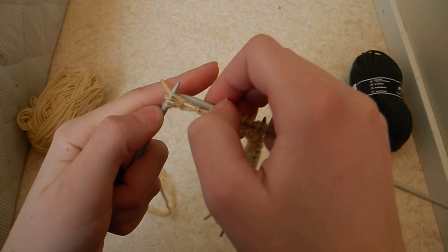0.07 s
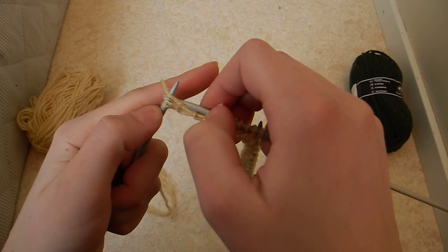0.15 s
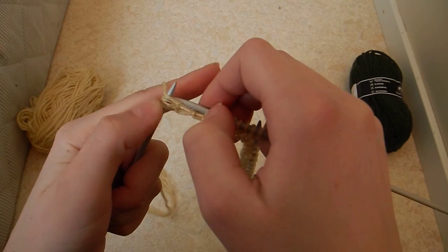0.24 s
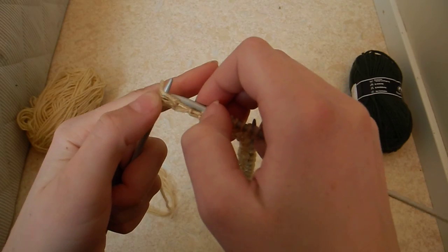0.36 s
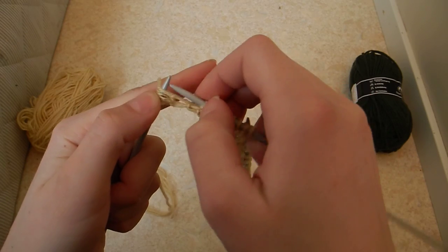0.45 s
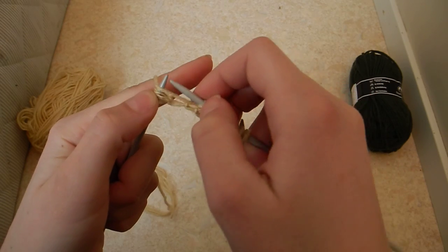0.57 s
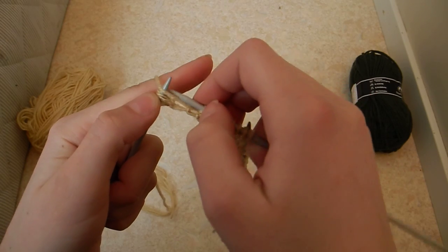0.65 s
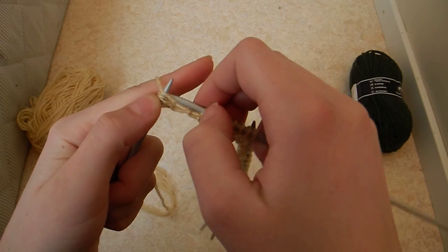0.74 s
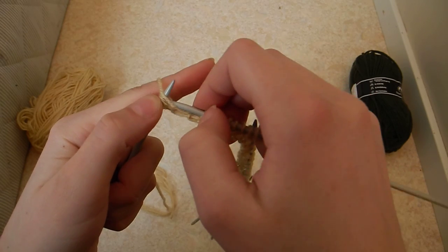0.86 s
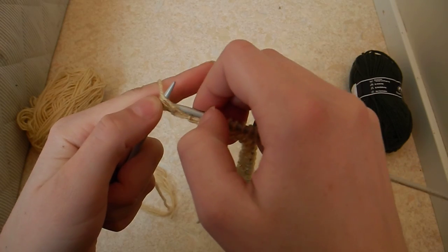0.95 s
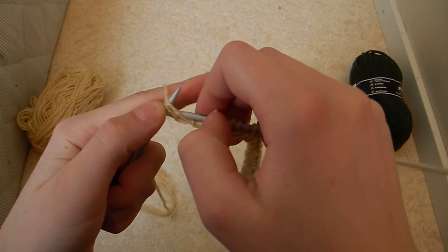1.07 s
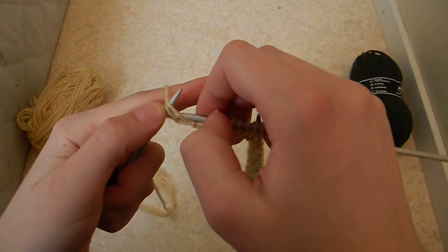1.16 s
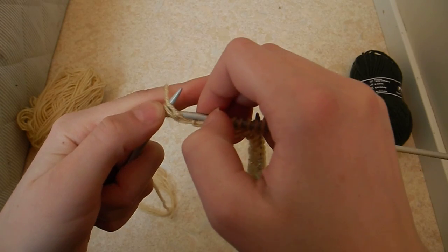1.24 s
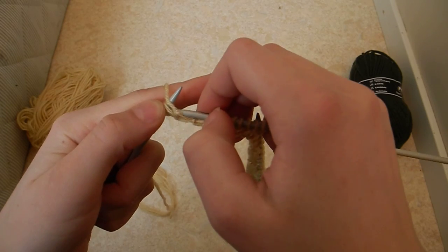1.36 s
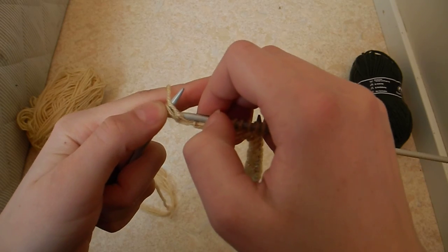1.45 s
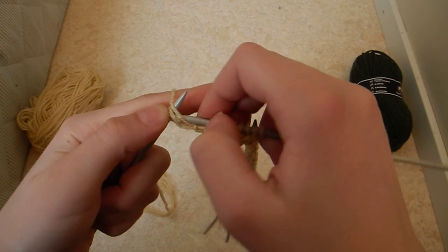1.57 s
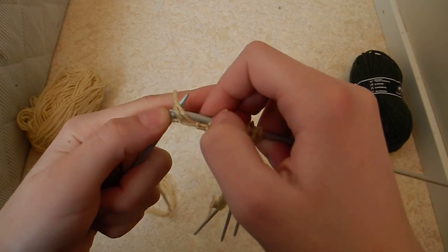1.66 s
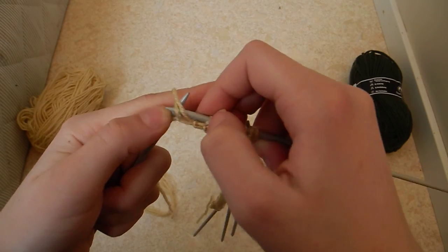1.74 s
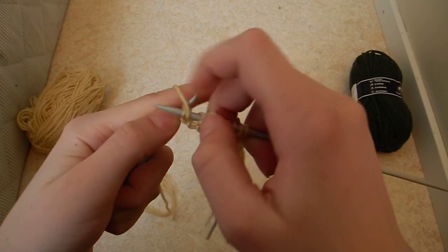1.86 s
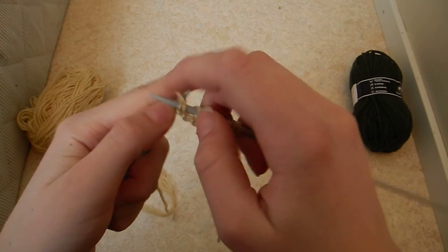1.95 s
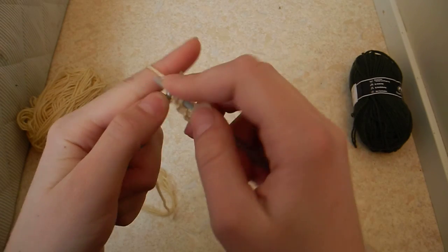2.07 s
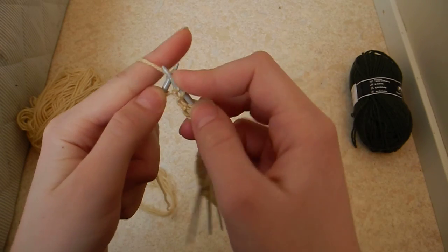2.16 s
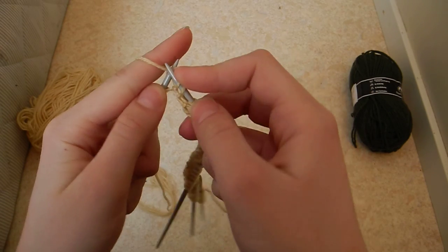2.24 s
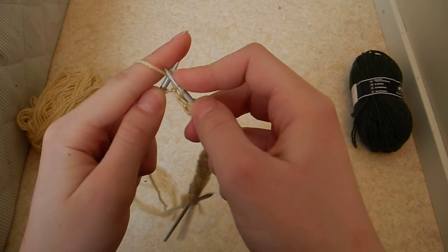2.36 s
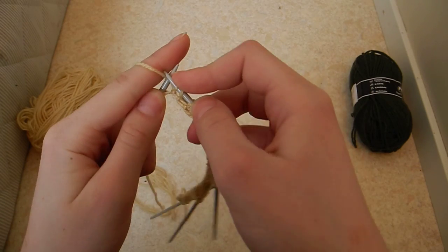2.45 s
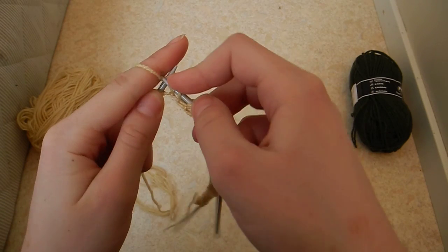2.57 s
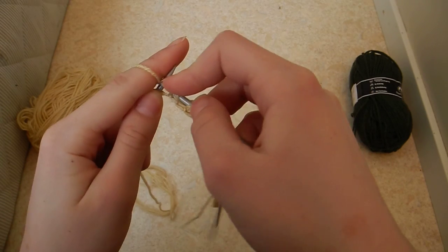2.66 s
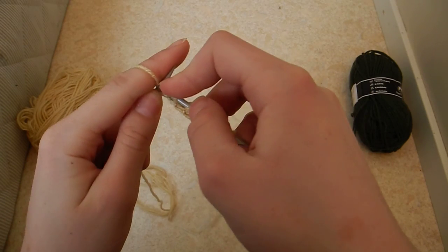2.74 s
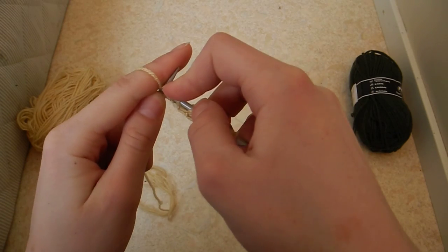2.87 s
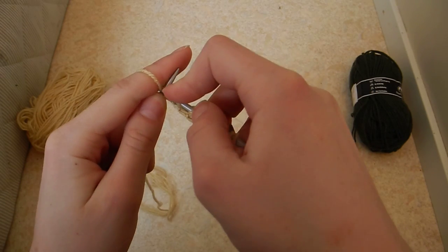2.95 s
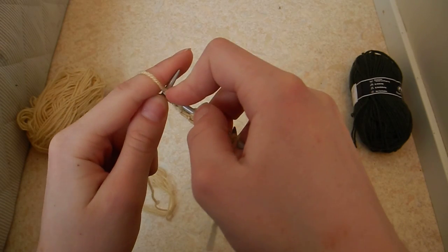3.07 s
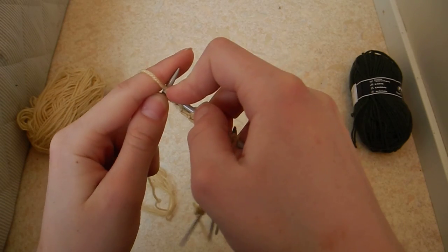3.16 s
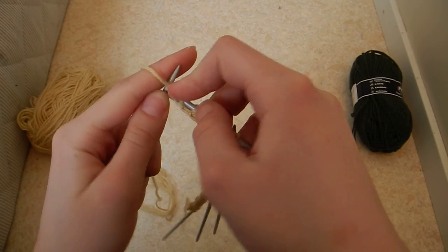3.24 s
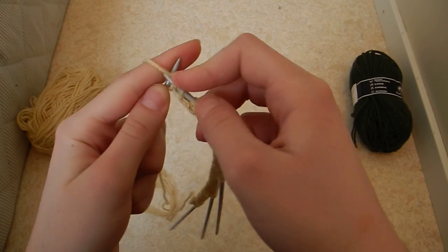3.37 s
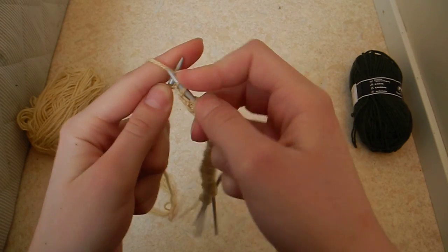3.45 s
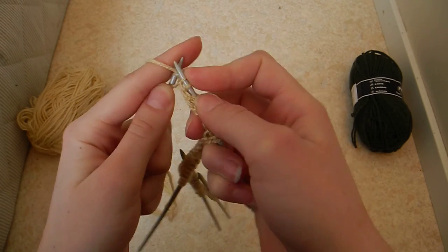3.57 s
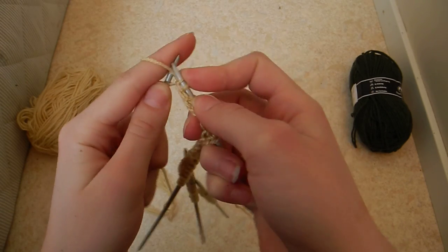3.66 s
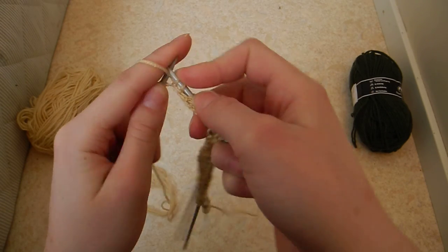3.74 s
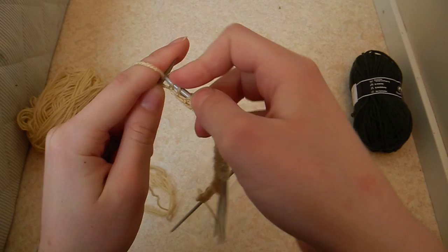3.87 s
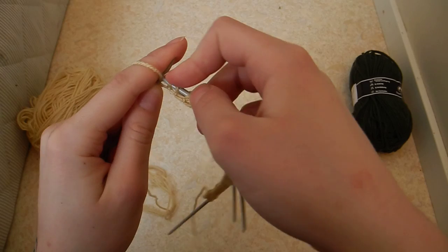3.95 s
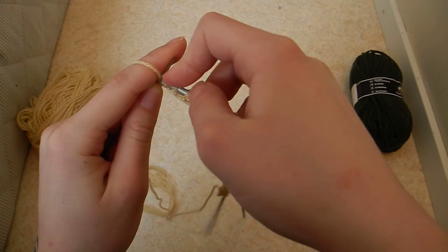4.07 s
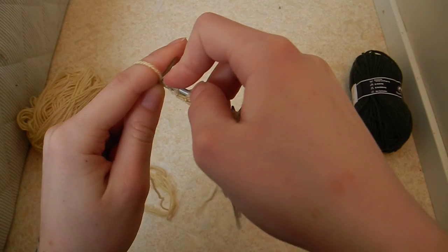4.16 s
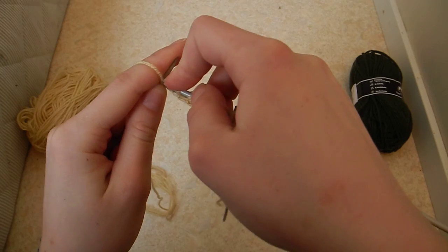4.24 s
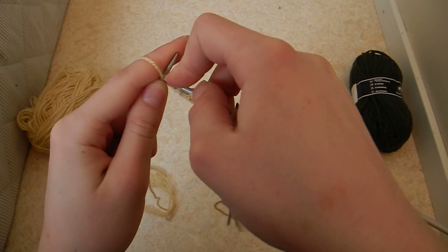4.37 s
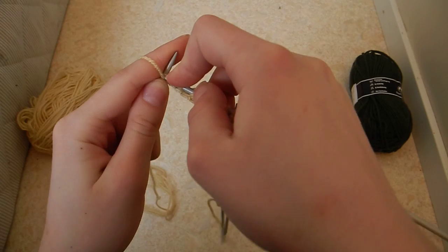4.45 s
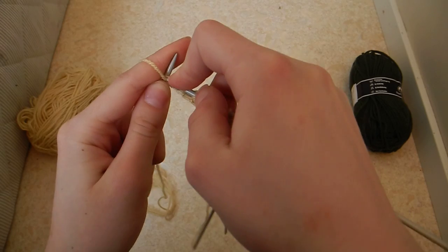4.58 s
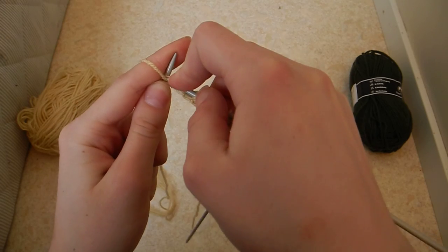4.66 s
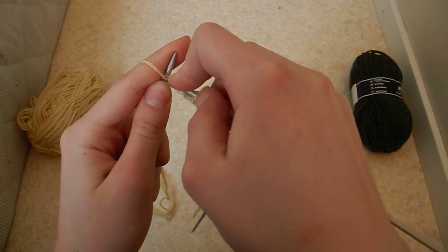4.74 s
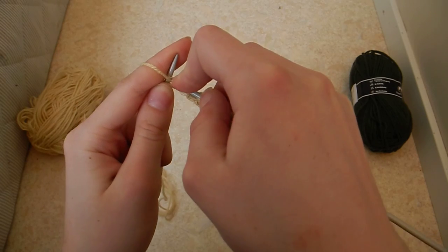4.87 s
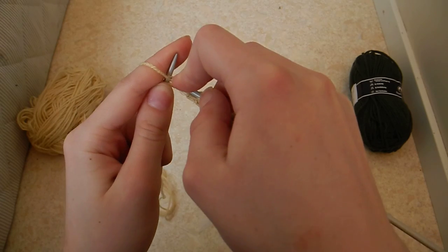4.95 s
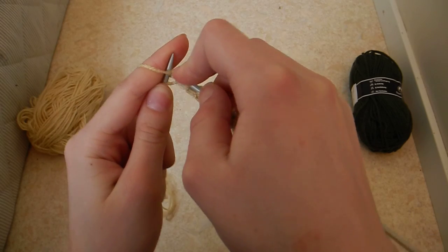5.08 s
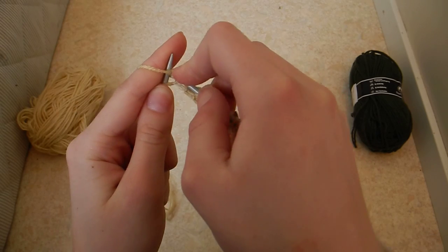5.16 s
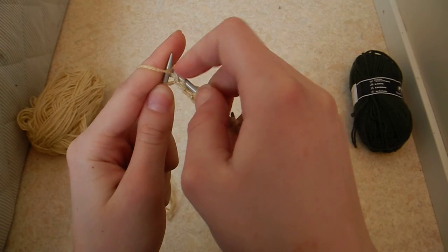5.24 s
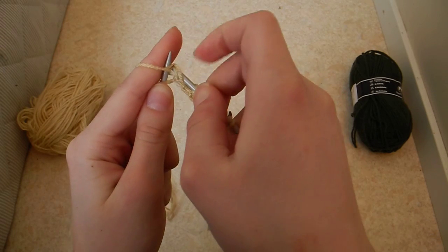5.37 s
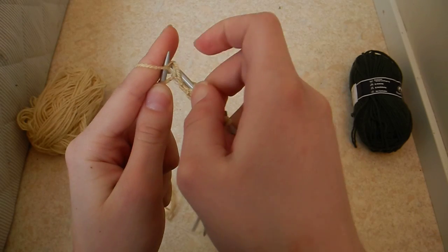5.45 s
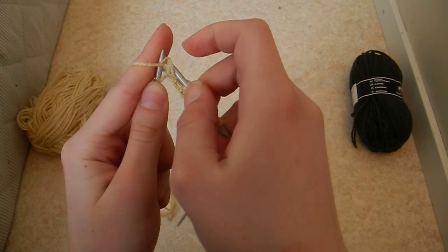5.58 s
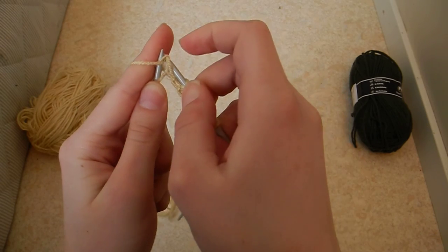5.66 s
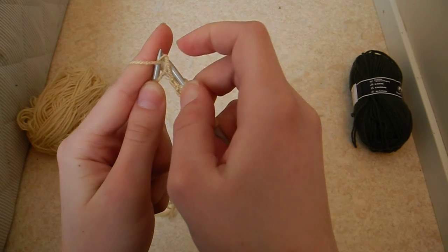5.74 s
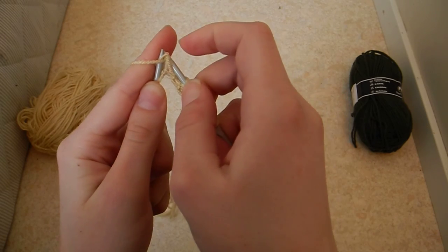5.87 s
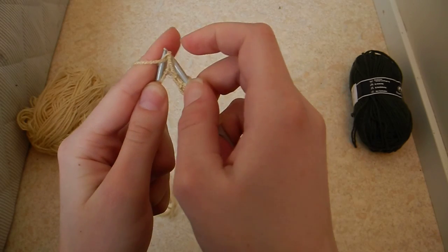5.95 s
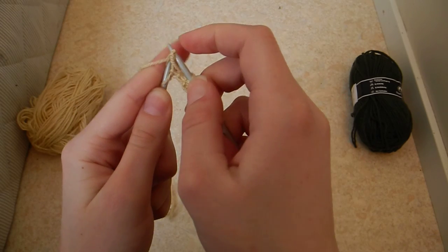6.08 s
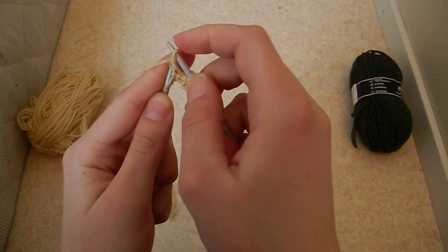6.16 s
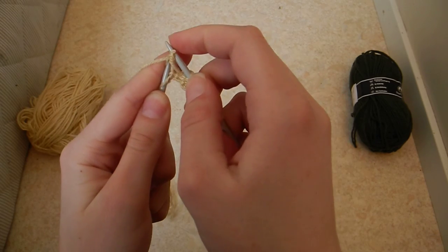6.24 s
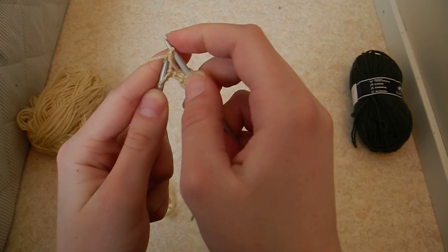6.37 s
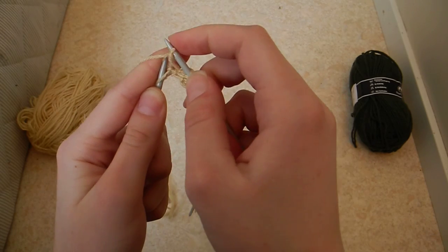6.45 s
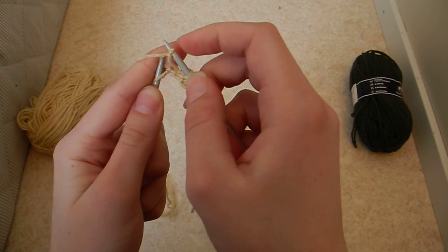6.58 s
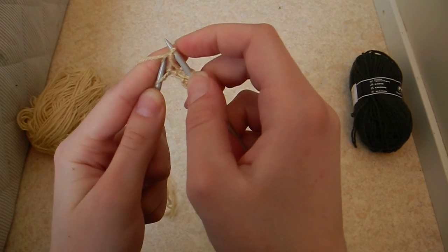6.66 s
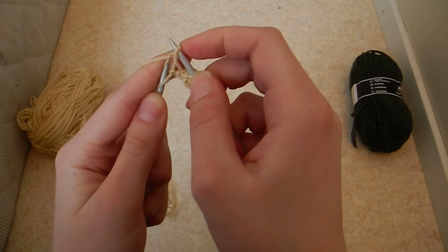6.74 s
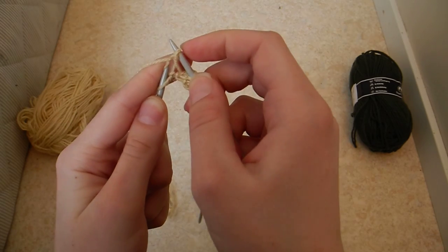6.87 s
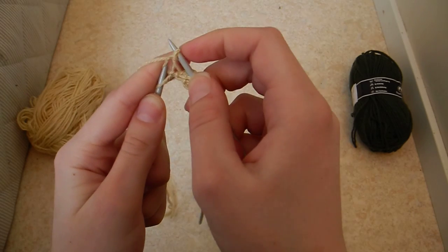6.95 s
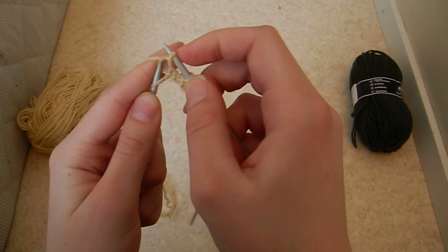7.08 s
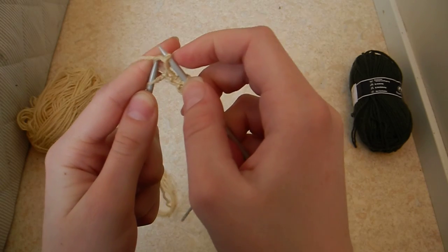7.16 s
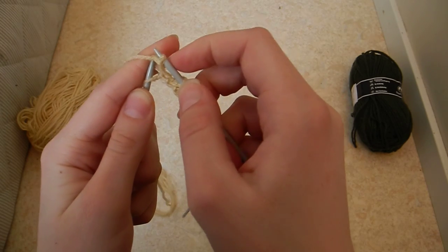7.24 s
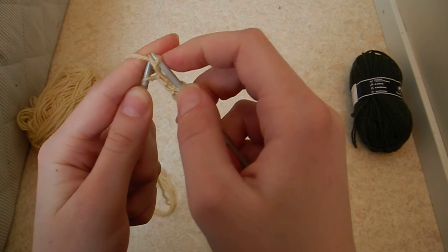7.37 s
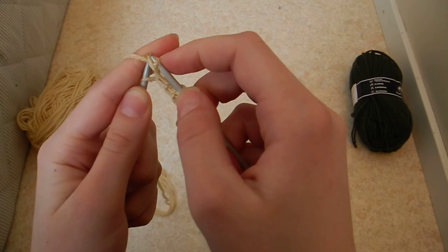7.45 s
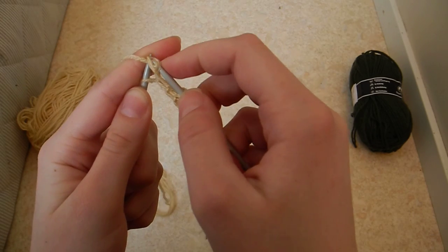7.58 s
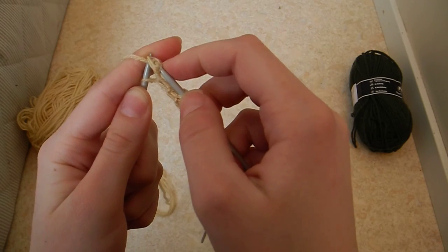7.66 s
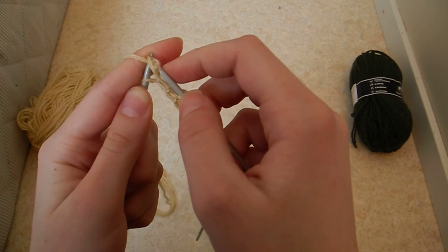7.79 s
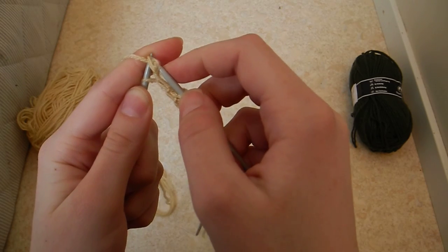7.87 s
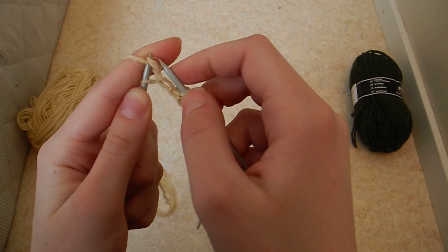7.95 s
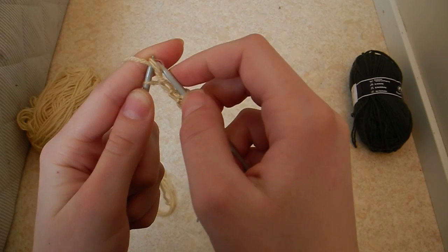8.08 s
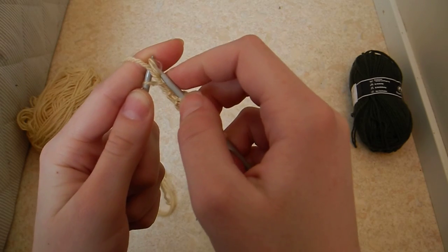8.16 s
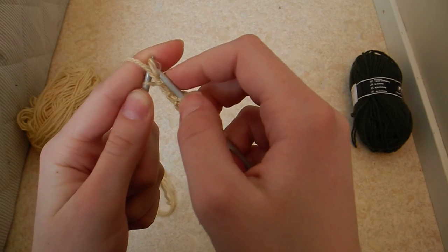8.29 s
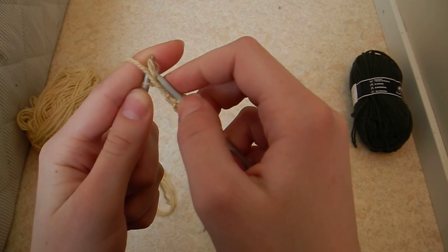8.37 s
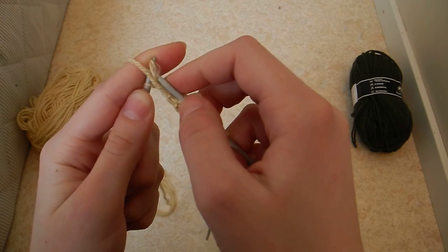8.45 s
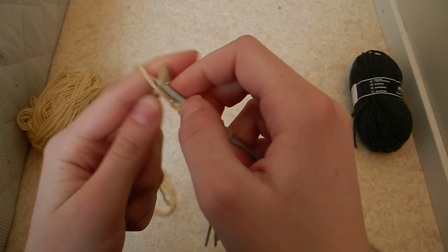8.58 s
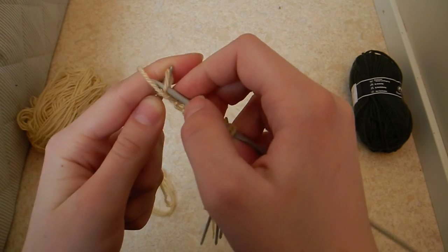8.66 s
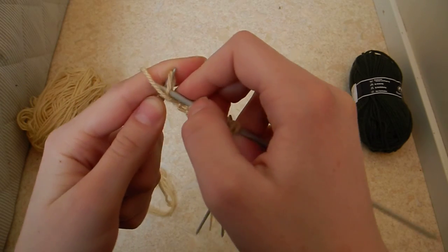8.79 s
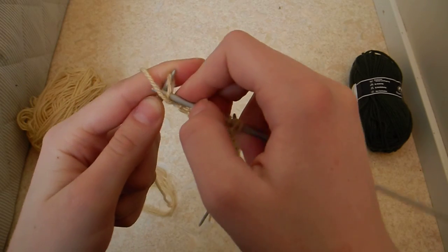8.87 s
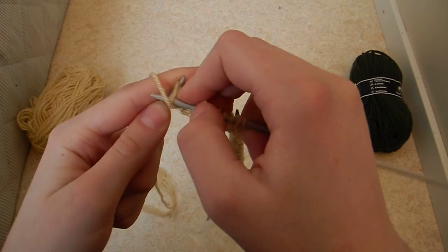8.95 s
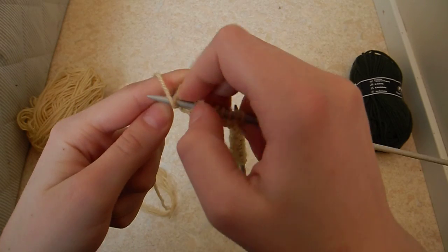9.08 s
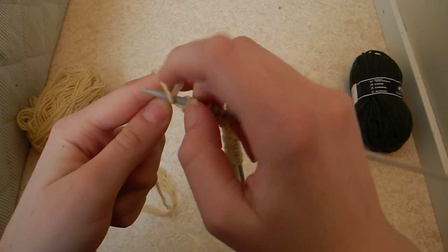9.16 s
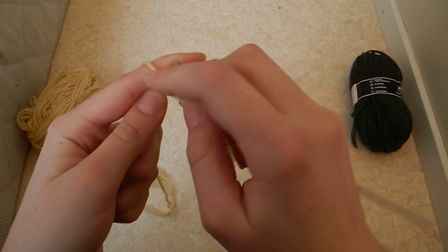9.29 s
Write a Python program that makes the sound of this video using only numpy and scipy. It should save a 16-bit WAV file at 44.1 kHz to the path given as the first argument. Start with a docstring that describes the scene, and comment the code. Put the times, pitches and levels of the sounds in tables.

```python
"""A quiet room: knitting with thin metal needles, heard close up.
The needles tap each other and ring in their bending modes, damped by fingers and wool.
Between the taps, tips tick as short noise snaps and yarn slides in fine noise grains.
Hard knocks sound, most of them near the end, where a loose needle knocks and bounces on something hard.
Mains hum and room air lie underneath; gain control ducks whenever treble peaks pass its limit."""
import sys
import numpy as np
from scipy import signal
from scipy.fft import rfft, irfft
from scipy.io import wavfile
from scipy.ndimage import uniform_filter1d, minimum_filter1d

SR = 44100
rng = np.random.default_rng(int(sys.argv[2]) if len(sys.argv) > 2 else 0)


def generate_wav(signal):
    """Clip the signal to [-1, 1] and save it as 16-bit WAV at the path in sys.argv[1]."""
    frames = np.transpose(np.atleast_2d(signal))
    scaled = np.clip(frames, -1, 1) * 32767
    pcm = np.round(scaled).astype(np.int16)
    wavfile.write(sys.argv[1], SR, pcm)


N = 411012
TIME = np.arange(N) / SR  # the whole scene [s]
RING = np.arange(int(.4 * SR)) / SR  # time within one short sound [s]


def undb(db):
    """Decibels to gain."""
    return 10 ** (np.asarray(db) / 20)


def unit(x):
    """Scale to rms 1."""
    return x / np.sqrt(np.mean(x ** 2))


def pan(db):
    """Left and right gains for a level difference, left minus right in dB."""
    return undb(np.array([[db], [-db]]) / 2)


def fade(t60):
    """Exponential decay that loses 60 dB in t60 seconds."""
    return np.exp(-np.log(1000) * RING / t60)


def add(out, s, sound):
    """Mix a stereo sound in at time s."""
    start = int(s * SR)
    out[:, start:start + sound.shape[1]] += sound[:, :N - start]


def colour(x, points):
    """Filter by a spectrum of (frequency [Hz], level [dB]) points, joined on a log frequency axis."""
    hz, db = np.transpose(points)
    f = np.maximum(np.fft.rfftfreq(x.shape[-1], 1 / SR), 1)
    gain = undb(np.interp(np.log(f), np.log(hz), db))
    return irfft(rfft(x) * gain, x.shape[-1])


def resonate(x, hz, q):
    """One resonance, gain 1 at its centre."""
    b, a = signal.iirpeak(hz, q, fs=SR)
    return signal.lfilter(b, a, x)


def stereo_noise(size, likeness):
    """White noise of which a share of the power is common to both channels."""
    common = rng.standard_normal(size)
    separate = rng.standard_normal((2, size))
    return np.sqrt(likeness) * common + np.sqrt(1 - likeness) * separate


def walk(rate):
    """Slow random drift of rms 1, with about rate new values a second."""
    k = int(SR / rate)
    steps = np.repeat(rng.standard_normal(N // k + 1), k)
    return unit(uniform_filter1d(steps, k)[:N])


def background():
    """Room air, most alike in both channels in the bass, and a slightly wavering mains hum."""
    # room air and microphone hiss: (frequency [Hz], relative level [dB])
    air_spectrum = [(20, -15), (48, -6), (100, -5.5), (170, -5), (300, -7), (500, -10.5), (800, -14),
                    (1300, -16), (1900, -21.5), (2800, -20.5), (4600, -28), (8000, -31), (15000, -32.5),
                    (16500, -41)]
    # mains hum partials: (frequency [Hz], mean level before panning [dB rms])
    hum_partials = [(100, -59), (200, -67), (300, -72), (400, -75.5), (500, -77.5)]
    shared = colour(rng.standard_normal(N), [(100, -5), (350, -5.5), (900, -9), (2500, -17.5)])
    air = unit(colour(rng.standard_normal((2, N)) + shared, air_spectrum))
    air = air * undb(-52.5 + 0.93 * walk(3))
    hum = np.zeros(N)
    for hz, db in hum_partials:
        level = undb(db + 1.0 * walk(4))
        phase = 2 * np.pi * hz * TIME + 0.12 * walk(5.5)
        hum += level * np.sqrt(2) * np.sin(phase)
    return air * pan(-1.57) + hum * pan(-.8)


def yarn():
    """Fibres catch and let go in tiny grains while the wool slides along a needle."""
    # slides: (middle [s], length [s], level at the middle [dB])
    slides = [(.50, 0.055, -63), (1.836, 0.08, -59), (5.088, 0.034, -58), (5.313, 0.056, -59),
              (6.088, 0.087, -63.5), (8.697, 0.6, -63), (9.07, 0.041, -62)]
    speed = sum(undb(db) * np.exp(-(2 * (TIME - s) / length) ** 2) for s, length, db in slides)
    grains = stereo_noise(N, 0.3) * undb(3.0 * walk(300))
    return speed * unit(colour(grains, [(800, -34), (3500, 2.5), (8000, -3), (16000, -6)]))


def ticks():
    """A tip slipping off a stitch, pressed into wool, cannot ring: a short snap with little bass."""
    # dry ticks: (time [s], level [dB], centre [Hz])
    tick_events = [(.4848, -49, 7300), (.7275, -37.5, 7300), (1.2967, -35, 17500), (1.4358, -44.5, 8000),
                   (2.0183, -49, 13200), (3.676, -42, 14700), (3.783, -32, 9000), (5.6243, -43, 5560),
                   (6.1185, -48, 6280), (6.2901, -47, 6470), (6.438, -45, 3430), (8.162, -43, 9250),
                   (8.36, -41, 13500), (8.8588, -45, 3120)]
    out = np.zeros((2, N))
    for s, db, hz in tick_events:
        snap = colour(stereo_noise(len(RING), 0.2), [(0.15 * hz, -26), (0.44 * hz, -1), (17000, -2)])
        snap = unit(snap + 1.1 * resonate(snap, hz, 3.7))
        add(out, s, undb(db) * pan(-.5) * snap * fade(0.016))
    return out


def room(x, wet_db, t60):
    """Reflections of a small furnished room, dense after a few milliseconds."""
    tail = colour(rng.standard_normal((2, len(RING))), [(200, 6), (6000, 2.5), (16000, 1)])
    tail = tail * fade(t60) * (1 - fade(0.0093))
    tail = unit(tail) / np.sqrt(len(RING))  # energy 1 on average per channel
    return undb(wet_db) * signal.fftconvolve(x, tail, axes=1)[:, :N]


def taps():
    """Each tap rings the bending modes; those with a node at the contact or by the microphone stay weak."""
    # needle against needle: (time [s], level [dB], contact point [share of the length],
    # point nearest the microphone [share of the length])
    tap_events = [(1.3592, -38.5, .425, .355), (2.0327, -33.5, 0.044, .37), (2.041, -37.5, .05, 0.37),
                  (2.801, -29.5, 0.459, 0.478), (2.843, -43, 0.15, 0.16), (2.947, -49, 0.13, .39),
                  (3.013, -36, 0.13, 0.056), (3.7849, -3.5, 0.039, .385), (3.8082, -38, .135, .385),
                  (4.0838, -27, 0.364, .21), (4.178, -22, .27, 0.3), (4.3655, -56, 0.1, .425),
                  (4.414, -50.5, 0.12, .42), (4.6513, -27.5, .14, 0.42), (5.169, -39.5, 0.43, 0.038),
                  (5.6734, -38, 0.04, 0.42), (6.152, -33.5, 0.031, .365), (6.5262, -54, .365, .445),
                  (7.0297, -24.5, 0.046, 0.248), (7.305, -44.5, 0.15, 0.39), (7.683, -39, 0.14, .37),
                  (7.8536, -51.5, 0.12, 0.17), (9.2205, -37.5, .185, .385), (9.261, -43, 0.16, .36)]
    # bending modes of a needle, second to tenth: (frequency [Hz], relative level [dB],
    # decay [multiple of the tap's t60], left minus right [dB], mean phase between the ports [rad])
    needle_modes = [(950, -21, 1.5, 1, .3), (1865, -8, 1.5, -7, -1.6), (3070, -16.5, 1.3, -4, 1.6),
                    (4570, -10, 1.2, -4, 1.1), (6335, -8, 1.05, -6, .4), (8375, -2.5, 1.05, -2, .8),
                    (10710, 1, 1.0, 4, 1.4), (13300, -1.5, 1.0, 7, .6), (15650, -22, .9, 5, -1.5)]
    ordinary_db = -36  # a harder tap than this is brighter and has less scrape for its ring
    tilt_db_per_octave, tilt_per_db = -0.56, 0.23  # brightness, and its rise per dB of strength
    scrape_db, scrape_drop_per_db = -1, 0.14
    attack_t60_s, t60_s = 0.0034, 0.053  # the decay is before the choke below
    out = np.zeros((2, N))
    for s, db, contact, nearest in tap_events:
        force_db = db - ordinary_db
        tilt_db = tilt_db_per_octave + tilt_per_db * force_db
        # the needles scrape for a moment as they meet
        scrape = colour(stereo_noise(len(RING), 0.21), [(500, -19.5), (5000, -6.5), (12000, 2), (16000, 1)])
        sound = undb(scrape_db - scrape_drop_per_db * force_db) * fade(0.021) * scrape
        for k, (hz, mode_db, hold, side_db, port_phase) in enumerate(needle_modes):
            # a free bar's mode shape at the two points
            points = np.array([contact, nearest])
            struck, heard = np.cos(np.pi * ((k + 2 + .5) * points + .5 / 2))
            coupling = np.sqrt((.08 + struck ** 2) * (.5 + heard ** 2))
            size = coupling * undb(mode_db + tilt_db * np.log2(hz / 8000))
            # the grip shifts the pitch a little; the needle's angle shifts the phase between the ports
            detune, turn = rng.standard_normal(2)
            between_ports = np.array([[0], [port_phase + .3 * turn]])
            phase = 2 * np.pi * hz * (1 + .0015 * detune) * RING + between_ports
            sound = sound + size * pan(side_db) * np.sin(phase) * fade(t60_s * hold)
        # staying in contact chokes the ring ever faster
        pressed = np.exp(-(RING / (.3 * t60_s)) ** 2)
        add(out, s, undb(db) * sound * pressed * (1 - fade(attack_t60_s)))
    return out


def singing():
    """The faint after-ring, in one mode, of a needle that the fingers hardly touch."""
    # after-rings: (time [s], frequency [Hz], level before attack, decay and panning [dB])
    singing_events = [(2.802, 1865, -59), (3.786, 1860, -49), (4.18, 1865, -76), (4.366, 6335, -47.5),
                      (4.414, 6335, -53), (4.431, 6335, -53), (5.171, 1865, -57), (7.032, 1865, -62),
                      (7.306, 1865, -59), (7.682, 1865, -57.5)]
    t60_at_2khz_s, damping_power = 0.37, 1.7  # higher modes die sooner
    out = np.zeros((2, N))
    for s, hz, db in singing_events:
        t60 = t60_at_2khz_s * (2000 / hz) ** damping_power
        ring = np.sin(2 * np.pi * hz * RING) * fade(t60) * (1 - fade(0.12 * t60))
        add(out, s, undb(db) * pan(-7) * ring)
    return out


def blows():
    """Each knock and its evenly spaced bounces of one strength, as (s, dB, ringing Hz, t60 s)."""
    # hard knocks: (time [s], level [dB], ringing [Hz], bounces [count], bounces against the knock [dB])
    knock_events = [(3.786, -16.5, 620, 0, 0), (9.1143, -11, 2660, 1, -19.5), (9.2611, -33, 4500, 0, 0),
                    (9.275, -14.5, 5770, 3, -10.5)]
    knock_t60_s, bounce_t60_s, bounce_gap_s = 0.012, 0.019, 0.0037
    last_bounce_hz = 935  # the bounces step down to this pitch
    for s, db, hz, count, bounce_db in knock_events:
        yield s, db, hz, knock_t60_s
        pitches = np.linspace(hz, last_bounce_hz, round(count) + 1)[1:]
        for k, bounce_hz in enumerate(pitches, 1):
            yield s + k * bounce_gap_s, db + bounce_db, bounce_hz, bounce_t60_s


def knocks():
    """Hard, dead blows with one broad resonance and any bounces; the crack spreads through the room."""
    # colour of a knock: (frequency [Hz], relative level [dB])
    knock_spectrum = [(100, -16), (400, 1), (1000, 0), (1500, -4), (2700, -1), (3600, -3), (6500, -.5),
                      (9000, -8.5), (12000, -14), (16000, -20)]
    side_db, lead_s = 5.5, .00008  # the left port is louder and hears it first
    near, spread = np.zeros((2, 2, N))
    for s, db, hz, t60 in blows():
        crack = colour(stereo_noise(len(RING), 0.47), knock_spectrum)
        envelope = undb(db) * pan(side_db) * fade(t60)
        add(near, s, envelope * unit(crack + 4.7 * resonate(crack, hz, 4.9)))
        add(spread, s, envelope * unit(crack))
    near[1] = np.pad(near[1], (round(lead_s * SR), 0))[:N]
    return near + room(spread, wet_db=-17.5, t60=.28)


def scene():
    """Needles and their reflections, knocks and yarn over the room's background."""
    needles = taps() + ticks() + singing()
    reflections = room(needles, wet_db=-12, t60=.22)
    return needles + reflections + knocks() + yarn() + background()


def gain_control(x, limit_db, hold_s, release_db_per_s):
    """Treble peaks over the limit turn the gain down at once; it stays down a moment, then comes back."""
    treble = signal.sosfilt(signal.butter(2, 9000, "high", fs=SR, output="sos"), x)
    peak_db = 20 * np.log10(np.abs(treble).max(axis=0) + 1e-9)
    over = np.maximum(peak_db - limit_db, 0)
    # the largest excess within the hold time just past
    half = max(int(hold_s * SR / 2), 1)
    held = -minimum_filter1d(-over, size=2 * half + 1, origin=half, mode="nearest")
    # a running maximum on a rising ramp lets the reduction shrink at the release rate
    recovery = release_db_per_s * TIME
    gain = undb(recovery - np.maximum.accumulate(held + recovery))
    # smooth over about a millisecond, still reaching full reduction at the peak
    return x * uniform_filter1d(minimum_filter1d(gain, size=89), size=45)


def record(dry):
    """Gain control on treble peaks, then a steep top cut at 15750 Hz."""
    held = gain_control(dry, limit_db=-9.5, hold_s=0.2, release_db_per_s=29)
    top_cut = signal.ellip(10, .2, 80, 15750, fs=SR, output="sos")
    return signal.sosfilt(top_cut, held)


dry = scene()
out = record(dry)
generate_wav(out)
```